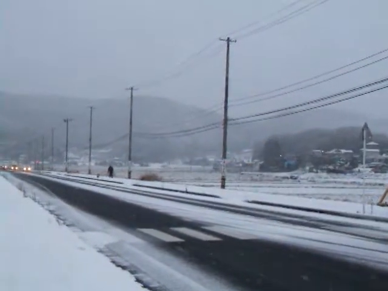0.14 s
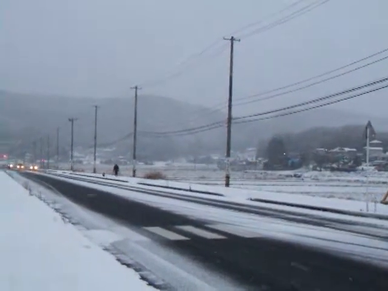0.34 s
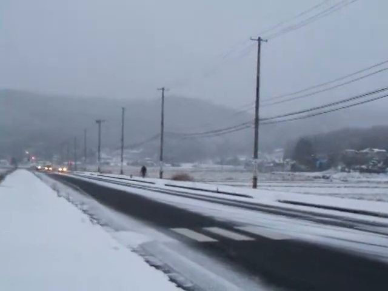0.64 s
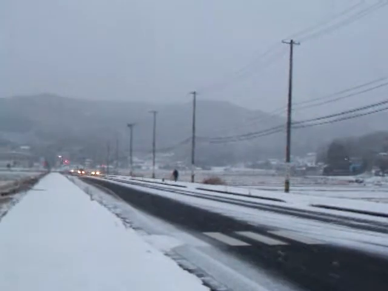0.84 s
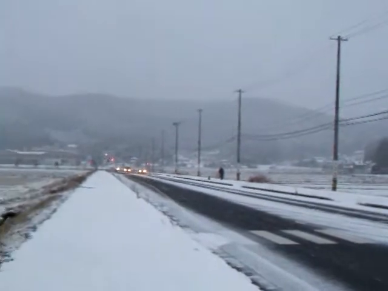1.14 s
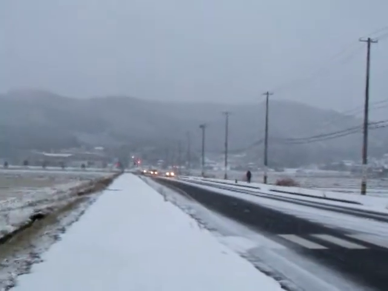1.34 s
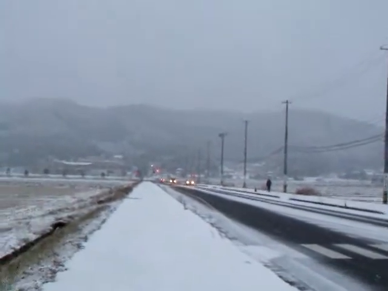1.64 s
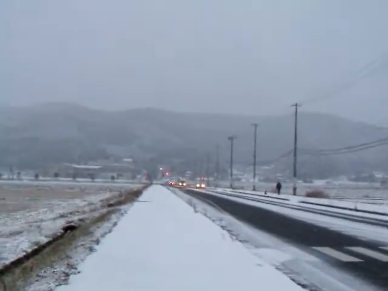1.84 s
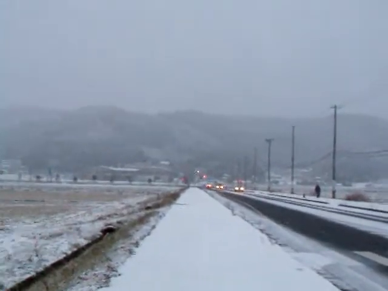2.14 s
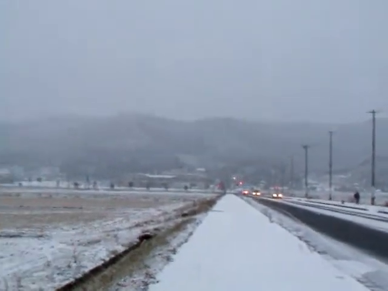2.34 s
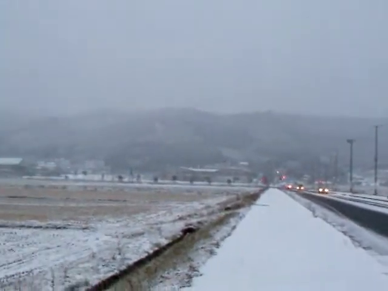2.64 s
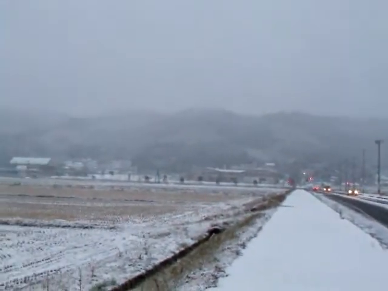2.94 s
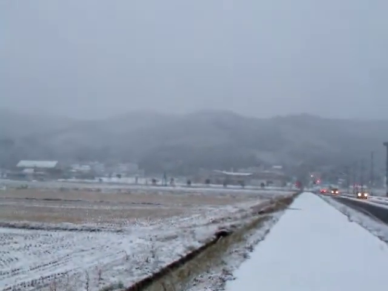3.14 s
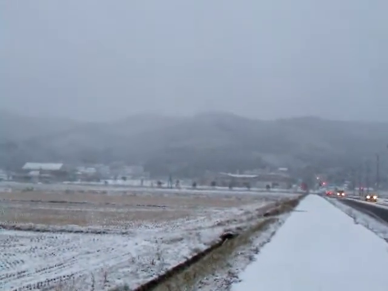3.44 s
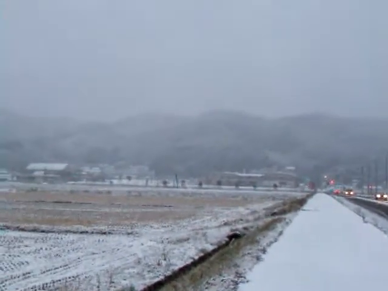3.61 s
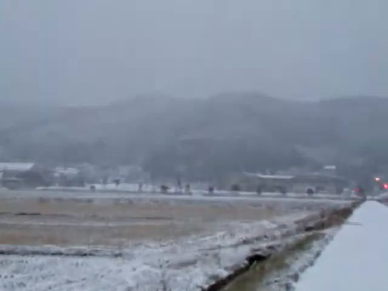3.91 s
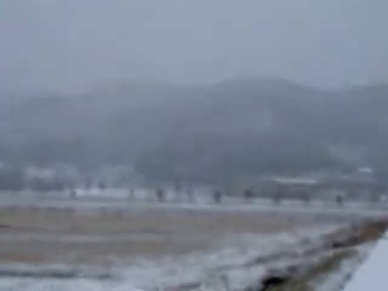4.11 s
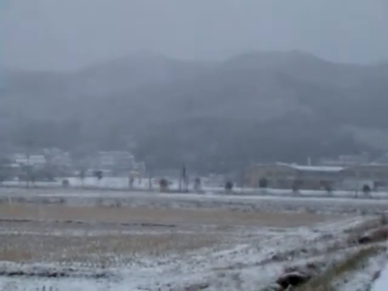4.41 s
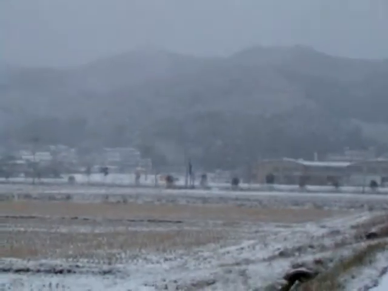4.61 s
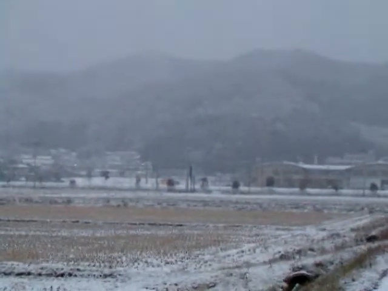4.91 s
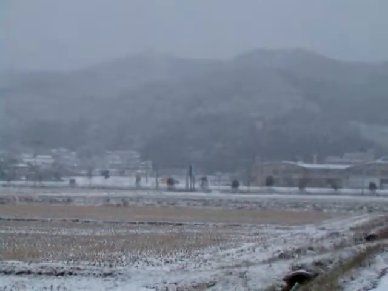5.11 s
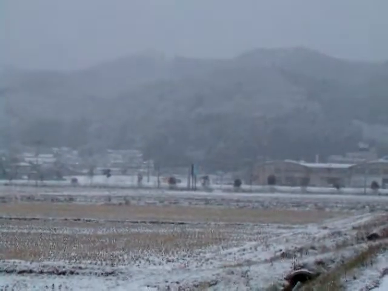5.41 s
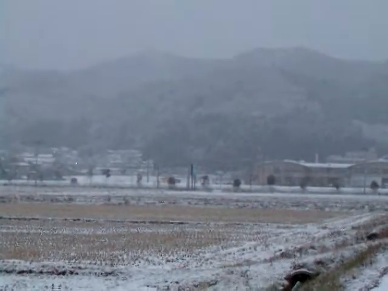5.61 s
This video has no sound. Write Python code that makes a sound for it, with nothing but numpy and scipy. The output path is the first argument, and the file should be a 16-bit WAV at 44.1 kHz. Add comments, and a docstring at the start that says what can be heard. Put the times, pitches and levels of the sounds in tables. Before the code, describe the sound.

Outdoors, a small microphone picks up tyres hissing and spraying through slush over the drone of a car and a diesel lorry. The vehicles slow a little and recede, the spray thinning and the hiss taking on a rising, sweeping colour. The lorry rattles faintly as it goes. Near the end a tiny high whistle, perhaps a far bird, sounds once over the soft rumble of distant traffic.

```python
"""A diesel lorry and a car draw away along a slushy road, heard on a small microphone.
Their engines hum lower as they slow, and the lorry ticks and knocks once each engine cycle.
Bands of noise make the rumble, tyre roar, slush hiss and fine spray. The echo off the snowy ground
cancels some pitches, cutting a notch that climbs through the hiss as the traffic recedes.
The tyres whine briefly; later come a hum of further traffic and one thin whistle."""
import sys
import numpy as np
from scipy import signal
from scipy.fft import rfft, irfft
from scipy.io import wavfile
from scipy.ndimage import uniform_filter1d

SR = 44100
rng = np.random.default_rng(int(sys.argv[2]) if len(sys.argv) > 2 else 0)


def generate_wav(sig):
    """Save sig (samples, or channels by samples) to the path in sys.argv[1] as 16-bit PCM at SR."""
    pcm = np.round(np.clip(np.atleast_2d(sig).T, -1, 1) * 32767).astype(np.int16)
    wavfile.write(sys.argv[1], SR, pcm)


N = 254016

# loudness of the traffic as it draws away: t/s, level/dB
TRAFFIC_FADE = [(0, -1), (.3, -0.5), (.65, 0.2), (.92, 0.9), (1.15, -0.5), (1.4, -0.5), (1.7, -1.5),
                (2.1, -2), (2.4, -3.5), (2.8, -6), (3.3, -7), (3.8, -8), (4.3, -11.5), (4.8, -11),
                (5.3, -12), (5.76, -11)]


def gain_of(db):
    """Turns decibels into a factor to multiply a sound by."""
    return 10 ** (np.asarray(db) / 20)


def evened(x):
    """Scales a signal to an average size (rms) of 1."""
    return x / np.sqrt(np.mean(x ** 2) + 1e-20)


def columns(rows, t):
    """Reads each column of a table at times t, along straight lines between rows."""
    times, *curves = np.transpose(rows)
    return [np.interp(t, times, curve) for curve in curves]


def waver(size):
    """A random wobble, smooth over about size samples."""
    return evened(uniform_filter1d(uniform_filter1d(rng.standard_normal(N), size), size))


def swell(t, peak_s, half_width_s):
    """A bell-shaped rise and fall of height 1."""
    return np.exp(-.5 * ((t - peak_s) / half_width_s) ** 2)


def band(hz, centre_hz, octaves, db):
    """The power at each pitch in a bell-shaped band of noise."""
    shape = np.exp(-.5 * (np.log2(hz / centre_hz) / octaves) ** 2) / hz
    return shape / shape.sum(0) * gain_of(2 * db)


def harmonic_levels(rows, t):
    """Each engine tone drifts steadily in level and swells once as the vehicle turns its side."""
    return [db - fade * t + rise_db * swell(t, s, width) for db, fade, s, width, rise_db in rows]


def hum(rate_hz, levels_db, multiples, waver_db, waver_rad):
    """Tones at whole multiples of one rate (harmonics); the higher ones wobble more."""
    cycles = np.cumsum(rate_hz) / SR
    sound = np.zeros(N)
    for k, db in zip(multiples, levels_db):
        level = gain_of(db + waver_db * np.sqrt(k) * waver(size=1500))
        phase = 2 * np.pi * k * cycles + waver_rad * np.sqrt(k) * waver(size=2500)
        sound += np.sqrt(2) * level * np.sin(phase)
    return sound


def lorry_engine(t, cycle_hz):
    """The diesel's repeating pulses make a stack of low tones."""
    # a row a tone: start level/dB, fade/(dB/s), swell time/s, half width/s, rise/dB
    tones = [(-61, 10, .3, 0.45, 13), (-42, 1.7, 1.3, .8, 3.5), (-45, 1.7, 1.07, 1, 11),
             (-49, 1, 2.3, 0.87, 10), (-53, 2.5, 0.78, 0.47, 3.5), (-59, -1.5, 2.4, 1, 1.5),
             (-65, 0, 2.3, 0.64, 13.5), (-53.5, -0.04, 5.0, 0.8, 3), (-60, 0.5, 2.8, 0.31, 2),
             (-53, 1.5, 3.1, 0.81, 7), (-59.5, 1.4, 3.8, 0.38, 13), (-64, 1, 2.7, .6, 7),
             (-63, -0.5, 3, 0.71, 4), (-67.5, 0.5, 3.2, .7, 7.5), (-70, 0, 3.7, 0.6, 15)]
    # each tone's multiple of the cycle rate
    multiples = [2, 3, 5, 6, 7, 8, 9, 10, 11, 12, 13, 17, 18, 52, 55]
    return hum(cycle_hz, harmonic_levels(tones, t), multiples, waver_db=-0.1, waver_rad=0.091)


def diesel_clatter(t, cycles):
    """A bright tick of noise each engine cycle, and a weaker one half a cycle later."""
    tick_s = 3.756  # one tick falls here and sets the timing of the rest
    cycles = cycles - cycles[round(tick_s * SR)]
    strength = gain_of(1.8 * rng.standard_normal(400))[np.floor(cycles).astype(int) % 400]
    ticks = np.exp(-(cycles % 1) / .13) + .2 * np.exp(-((cycles + .5) % 1) / .12)
    ticks = uniform_filter1d(strength * ticks, size=90)  # distance softens each start
    treble = signal.butter(3, [2600, 8000], "bandpass", fs=SR, output="sos")
    bright = signal.sosfilt(treble, rng.standard_normal(N))
    level_db = -52.5 + 1.36 * columns(TRAFFIC_FADE, t)[0] + 8.4 * swell(t, 4.03, 0.16)
    return gain_of(level_db) * evened(ticks * bright)


def car_engine(t, half_firing_hz):
    """The car's firing makes a stack of tones, two of which stand out as hums."""
    # a row a tone: start level/dB, fade/(dB/s), swell time/s, half width/s, rise/dB
    tones = [(-74, -2, .3, .7, 13), (-45, 1.2, 0.64, 0.98, 9.5), (-42.5, 3.5, 1, 0.33, 8),
             (-51.5, 1.5, 0.5, 0.37, 6), (-55, -0.2, 0.85, 0.72, 14.5), (-52, 1.7, 2.5, 0.62, 2),
             (-53, 4, 1, 0.19, 12.5)]
    # the two hums: t/s, lower hum/dB, upper hum/dB
    hums = [(0, -52, -39), (.2, -49, -41), (.45, -44, -38.5), (.7, -42, -45), (.93, -34, -41),
            (1.1, -36, -46), (1.25, -38, -46), (1.4, -43, -49), (1.65, -44, -51), (1.9, -51, -55),
            (3, -55, -62), (5.76, -59, -70)]
    # multiples of half the firing rate: the tones, then the two hums
    multiples = [1, 2, 4, 5, 8, 19, 6, 10, 13]
    levels_db = harmonic_levels(tones, t) + columns(hums, t)
    return hum(half_firing_hz, levels_db, multiples, waver_db=0.5, waver_rad=.26)


def rumble_and_roar(t, hz):
    """Power of the traffic's rumble, drone and tyre roar, which fade with distance."""
    fade_db, = columns(TRAFFIC_FADE, t)
    rumble = band(hz, 139 - 6 * t, octaves=1.46, db=-35.5 + 0.65 * fade_db)
    drone_db = -27.5 + 0.96 * fade_db + 1.7 * swell(t, 0.98, 0.066)
    drone = band(hz, 330 - 3 * t, octaves=0.8448, db=drone_db)
    roar = band(hz, 932 + 89.5 * t, octaves=0.5, db=-30.5 + fade_db)
    return rumble + drone + roar


def slush(t, hz):
    """Power of tyres running through slush: a wet wash, a higher hiss and fine spray on top."""
    # the wet road: t/s, wash level/dB, hiss level/dB
    wetness = [(0, -33.5, -31.5), (.3, -34, -30), (.7, -38, -34.5), (1.1, -68, -30), (1.5, -46, -28.5),
               (1.8, -36, -32), (2.15, -40, -33.5), (2.4, -36.5, -41.5), (2.6, -35, -42),
               (3.0, -36.5, -39.5), (3.3, -43.5, -35.5), (3.8, -59, -37), (4.4, -49, -39.5),
               (5.0, -47, -45.5), (5.3, -47.5, -46.5), (5.76, -47, -50)]
    # fine spray: t/s, centre/Hz, level/dB
    fine_spray = [(0, 6200, -34), (.25, 6270, -34), (.45, 6340, -35), (.7, 6170, -33.5), (.95, 6080, -33),
                  (1.25, 6082, -38.5), (1.48, 6300, -42), (1.56, 6000, -35), (1.8, 5840, -35),
                  (2.05, 5900, -35.5), (2.4, 5700, -38), (2.7, 5960, -44), (3.5, 6003, -51),
                  (4.2, 6347, -55), (5.76, 6360, -55)]
    wash_db, hiss_db = columns(wetness, t)
    spray_hz, spray_db = columns(fine_spray, t)
    wash = band(hz, 1870, octaves=0.38, db=wash_db)
    hiss = band(hz, 3383, octaves=0.35, db=hiss_db)
    spray = band(hz, spray_hz, octaves=0.24, db=spray_db)
    return wash, hiss, spray


def tread_song(t, hz):
    """Power of the tyre tread singing in narrow bands that come and go."""
    # a row a swell: t/s, half width/s, centre/Hz, glide/(Hz/s), width/octaves, level/dB
    swells = [(.5, 0.21, 1150, 30, .26, -34), (1.0, 0.14, 1340, 30, 0.28, -42),
              (1.4, 0.15, 940, 100, 0.33, -32), (2.13, 0.16, 1570, 600, .17, -34.5),
              (2.9, .2, 1180, 100, 0.19, -40), (3.5, 0.46, 1270, 30.2, 0.33, -39),
              (3.65, 0.14, 2570, 300, 0.097, -48), (4.25, 0.28, 1220, 30, 0.29, -41.5),
              (4.95, .3, 1395, 100, .3, -45.5), (5.45, 0.25, 1623, 30, 0.3, -45.5)]
    return sum(band(hz, np.maximum(centre + glide * (t - s), 200), octaves, db) * swell(t, s, width)
               for s, width, centre, glide, octaves, db in swells)


def echo_notches(hz, notch_hz, strength, reach):
    """Share of power left when an echo cancels some pitches; rough snow blurs the higher notches."""
    echo = np.clip(strength, 0, .95) * np.exp(-(hz / notch_hz / reach) ** 2)
    return (1 + echo ** 2 + 2 * echo * np.cos(np.pi * hz / notch_hz)) / (1 + echo) ** 2


def ground_echoes(t, hz):
    """Two echoes off the ground: a faint one from the near lorry, then one from the receding traffic."""
    # the near echo: t/s, strength/0-1, first notch/Hz
    near_echo = [(0, 0.34, 5170), (.45, 0.43, 5150), (.75, 0, 5200), (1.0, 0.16, 5400), (1.35, 0.5, 5400),
                 (1.55, 0.42, 4830), (2.1, 0.32, 4650), (2.5, 0, 4600)]
    # the far echo's first notch climbs with distance: t/s, f/Hz
    climbing_notch = [(2.0, 1040), (2.3, 1340), (2.65, 2127), (2.9, 2700), (3.1, 3400), (3.45, 4830),
                      (4.0, 6230)]
    near_strength, near_hz = columns(near_echo, t)
    far_hz, = columns(climbing_notch, t)
    near = echo_notches(hz, near_hz, near_strength, reach=0.94)
    far = echo_notches(hz, far_hz, strength=0.86 * swell(t, 2.9, 0.55), reach=1.4)
    return near * far


def road_noise():
    """Tyres on the wet road: short overlapping slices of noise, shaped by the bands and echoes."""
    size, step = 1024, 256  # samples
    hz = np.fft.rfftfreq(size, 1 / SR)[:, None] + 1
    t = np.arange(N // step + 5) * step / SR
    real, imaginary, patches = rng.standard_normal((len(t), len(hz), 3)).T
    patches = uniform_filter1d(patches, size=6, axis=0)  # louder and softer spots in pitch and time
    patches = evened(uniform_filter1d(patches, size=16, axis=1))
    noise = (real + 1j * imaginary) * gain_of(0.57 * patches)
    notches = ground_echoes(t, hz)

    def sound_of(power):
        slices = noise * np.sqrt(3 / 8 * power * notches)
        return signal.istft(slices, nperseg=size, noverlap=size - step)[1][:N]

    wash, hiss, spray = slush(t, hz)
    smooth = rumble_and_roar(t, hz) + wash + tread_song(t, hz)
    spatter = gain_of(waver(size=60) + 0.61 * waver(size=600))  # droplets burst unevenly
    return sound_of(smooth) + sound_of(hiss) * spatter ** 0.59 + sound_of(spray) * spatter


def tyre_whine(t):
    """The tyres give one faint, slowly falling tone."""
    # the whine: t/s, f/Hz, level/dB
    whine = [(0, 962, -78), (.9, 950, -62), (1.05, 948, -50), (1.3, 945, -48.5), (1.55, 940, -49),
             (1.8, 937, -58), (2.0, 935, -80)]
    hz, db = columns(whine, t)
    return hum(hz, [db], multiples=[1], waver_db=1.5, waver_rad=.6)


def body_knock(t, cycles):
    """One uneven blow each engine cycle rings the lorry's body, heard as it turns its tail."""
    ring_hz, width_hz, smear_s = 1100, 340, .04
    blows = np.diff(np.floor(cycles), prepend=0) * gain_of(1.5 * rng.standard_normal(N))
    scattered_echoes = rng.standard_normal(round(smear_s * SR))
    blows = signal.oaconvolve(blows, scattered_echoes)[:N]
    body = signal.iirpeak(ring_hz, ring_hz / width_hz, fs=SR)
    ring = signal.lfilter(*body, signal.lfilter(*body, blows))  # twice, for a narrower ring
    return gain_of(-49.5) * swell(t, 3.7, .5) * evened(ring)


def far_traffic(t):
    """Further traffic adds one low hum that grows towards the end."""
    # the far hum: t/s, f/Hz, level/dB
    far_hum = [(0, 62, -80), (3.3, 62, -70), (4.0, 61, -58), (4.8, 58, -56), (5.4, 56, -54),
               (5.76, 55, -55)]
    hz, db = columns(far_hum, t)
    return hum(hz, [db], multiples=[1], waver_db=2.2, waver_rad=.6)


def whistle(t):
    """One short, thin tone, perhaps a far bird."""
    start_s, length_s, pitch_hz = 4.4, .145, 4805
    age = t - start_s
    arch = np.sqrt(abs(np.sin(np.pi * np.clip(age / length_s, 0, 1))))
    return gain_of(-50.5) * arch * np.sin(2 * np.pi * pitch_hz * age)


def scene():
    """Engines, road noise and the whistle, added into one channel."""
    # engine speeds: t/s, lorry cycle rate/Hz, half the car's firing rate/Hz
    speeds = [(0, 24.59, 44.03), (.72, 24.13, 42.7), (1.3, 23.97, 41.55), (1.6, 23.79, 41.35),
              (2.16, 23.64, 40.67), (2.88, 23.38, 39.92), (3.96, 23.47, 39.2), (5.76, 23.57, 39.06)]
    t = np.arange(N) / SR
    lorry_hz, car_hz = columns(speeds, t)
    lorry_cycles = np.cumsum(lorry_hz) / SR
    hums = lorry_engine(t, lorry_hz) + car_engine(t, car_hz) + far_traffic(t) + tyre_whine(t)
    rattles = diesel_clatter(t, lorry_cycles) + body_knock(t, lorry_cycles)
    return (hums + rattles + road_noise() + whistle(t))[None]


def record(dry):
    """The small microphone adds its own hiss, favours some pitches and loses the highest treble."""
    # the microphone's boost or cut: f/Hz, gain/dB
    response = [(20, -13), (33, -7.5), (41, -1), (50, 2.5), (75, -3.5), (100, -3), (135, 0.5), (200, 1),
                (400, 0.5), (485, 1), (600, 3), (800, 3.5), (1500, 3.5), (2500, 2), (3800, 2.5), (4700, 0),
                (6000, -0.5), (7200, 1), (8000, -1.5), (9000, -1.5), (9500, -5.5), (9850, -14)]
    hz, db = np.transpose(response)
    colour = gain_of(np.interp(np.log(np.fft.rfftfreq(N, 1 / SR) + 1), np.log(hz), db))
    hiss = gain_of(-76) * rng.standard_normal(N)
    heard = irfft(rfft(dry + hiss) * colour, N)
    treble_cut = signal.firwin(1023, cutoff=9884, window=("kaiser", 10), fs=SR)
    return signal.oaconvolve(heard, treble_cut[None], "same")


dry = scene()
out = record(dry)
generate_wav(out)
```